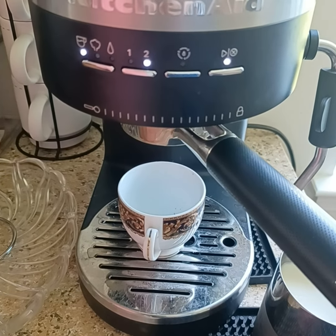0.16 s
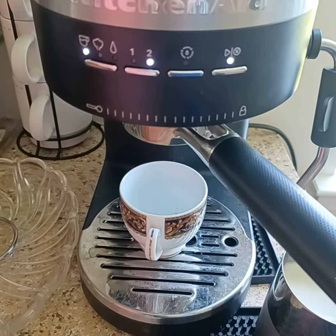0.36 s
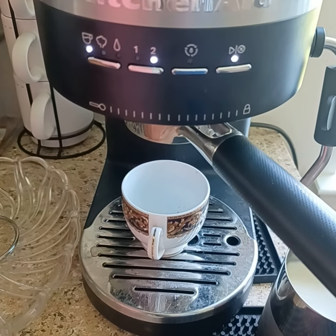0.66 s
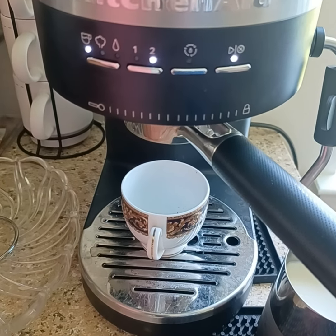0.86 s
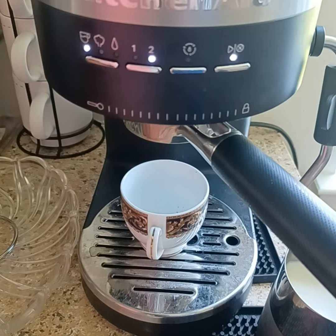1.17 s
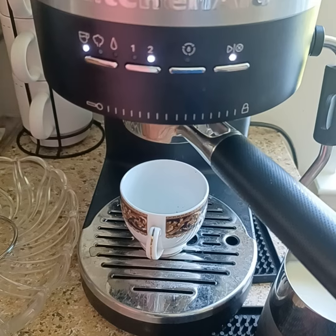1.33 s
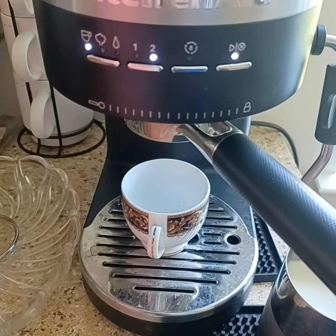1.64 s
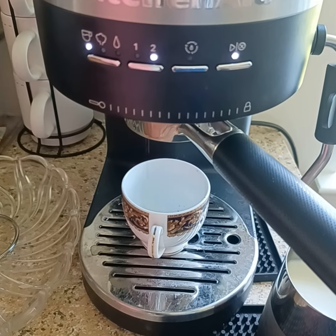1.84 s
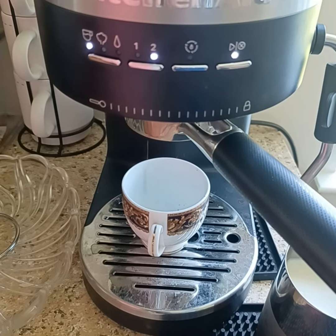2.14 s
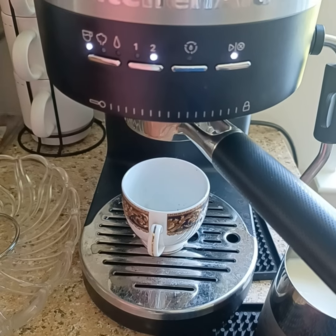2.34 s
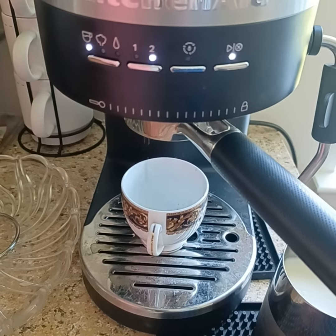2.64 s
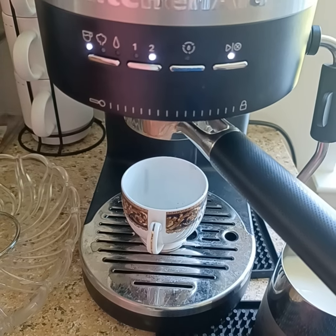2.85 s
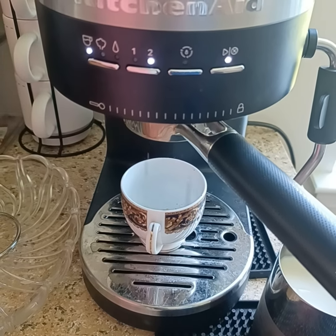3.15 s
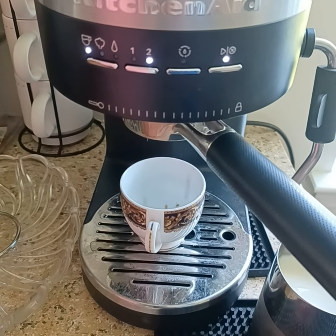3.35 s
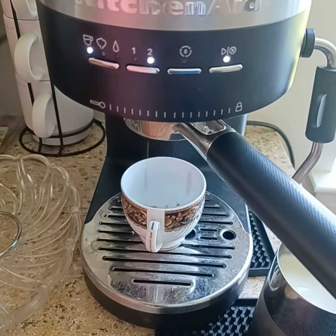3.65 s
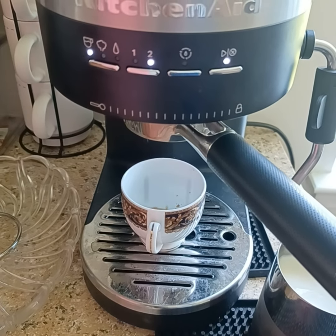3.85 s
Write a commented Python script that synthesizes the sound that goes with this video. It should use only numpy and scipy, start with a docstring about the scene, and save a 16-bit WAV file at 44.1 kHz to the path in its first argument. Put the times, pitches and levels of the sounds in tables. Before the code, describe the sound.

An espresso machine pump runs close to a stereo microphone in a kitchen, a steady low buzzing drone with fast pulsing rattle and hollow housing ring. Short grainy spits of hiss sprinkle over it until 1.8 s. Around 1.95 s it fades quickly with a dull low knock, gone by 2.2 s. Quiet room noise and wavering low hum remain, with faint drip-like ticks near 2.35, 2.9 and 3.1 s.

```python
"""An espresso machine's vibrating pump hums close to a microphone pair in a kitchen: mains-locked tones,
a piston blow per cycle ringing the housing, rattle and chatter as noise pulsing or bursting with the stroke.
The brew head spits grainy bursts of hiss. The pump fades out quickly around a dull two-partial knock;
a wavering far appliance hum, coloured room noise with faint whistles, and a few ticks, perhaps drips, remain."""
import sys
import numpy as np
from scipy import signal
from scipy.fft import rfft, irfft
from scipy.io import wavfile

SR = 44100
rng = np.random.default_rng(int(sys.argv[2]) if len(sys.argv) > 2 else 0)


def linear_from_db(decibels):
    """Turn decibels (scalar or array-like) into linear amplitude factors; 0 gives 1."""
    return 10 ** (np.asarray(decibels, float) / 20)


def to_wav(sig):
    """Store sig (one row per channel, or 1-D mono) as 16-bit WAV at the path in sys.argv[1].

    Samples outside -1..1 are clipped; the rate is SR.
    """
    pcm = np.clip(np.atleast_2d(sig), -1, 1) * 32767
    pcm = np.round(pcm).astype(np.int16)
    wavfile.write(sys.argv[1], SR, pcm.T)  # frames by channels


N = 176400  # samples, 4 s

MAINS_HZ, STROKE_AT_S = 60.0, 0.009  # the first piston blow falls at STROKE_AT_S
MIC_LOW_CUT_HZ, MIC_TOP_CUT_HZ = 62, 15750

# Room noise colour. Each row: frequency in Hz, relative level in dB per Hz.
ROOM_COLOUR = [(24, -49), (45, -10), (75, -13.5), (140, -12), (170, -15.5), (260, -11), (340, -19),
               (410, -21.5), (450, -17), (590, -20), (800, -18), (940, -22.5), (1110, -21.5), (1400, -23.5),
               (2050, -24), (2450, -29), (2750, -37), (3470, -39), (3900, -41.5), (4700, -40.5),
               (5300, -54.5), (6500, -47.5), (8200, -50), (9500, -56), (12500, -51), (15800, -53)]
# How alike the room is at both microphones. Each row: frequency in Hz, likeness from -1 to 1.
ROOM_LIKENESS = [(60, 0.48), (130, 0.81), (290, 0.69), (640, 0.23), (1410, -0.091), (3100, -0.051),
                 (6820, -0.061), (15000, -0.075)]
# Lean of the room noise. Each row: frequency in Hz, left over right in dB.
ROOM_BALANCE = [(60, -3.5), (180, -0.5), (550, 3.5), (1650, 0), (4970, 4.5), (15000, 0.5)]
ROOM_DB = -60  # rms
# Faint narrow hisses in the room. Each row: centre in Hz, width in Hz, level in dB, flicker in dB.
ROOM_WHISTLES = [(814, 41, -76, 1), (2070, 50, -94, -1), (1103, 32, -79, 0), (666, 28, -76, 1)]
# A faint high whine comes and goes. Each row: time in seconds, level in dB.
WHINE_LEVEL = [(0, -99), (2.2, -97), (2.45, -81), (2.7, -91), (3.0, -84), (3.1, -82), (3.3, -88),
               (3.45, -82), (3.6, -83), (3.75, -90), (3.82, -100), (3.92, -84), (4, -87)]
WHINE_HZ, WHINE_WIDTH_HZ = 3480, 90
# The room's hiss from 2.8 to 5 kHz. Each row: time in seconds, level in dB.
UPPER_HISS_LEVEL = [(0, -97), (2.2, -81), (2.45, -78), (2.65, -85), (3.0, -86), (3.3, -83), (3.55, -77.5),
                    (3.7, -86), (4, -99)]

# Far appliance hum. Each row: multiple of mains, level in dB rms, left over right in dB, wander in dB.
HUM_ORDERS = [(2, -56, 3, 1.6), (4, -73.5, 1.8, 1.5), (6, -73, 2, 0)]
# The hum wavers about its mean level. Each row: time in seconds, level in dB.
HUM_SWELL = [(2.2, -62.5), (3.072, -63.5), (3.142, -62), (3.598, -65), (3.622, -66), (4.0, -65.5)]

# Faint ticks. Each row: start in seconds, level in dB, centre in Hz, left over right in dB.
TICKS = [(2.3468, -67, 11000, 12), (2.9225, -58.5, 6000, -1), (2.933, -72, 6500, 14), (2.946, -72, 6600, 2),
         (3.119, -68, 10100, 10)]
# Small bright modes a tick can ring. Each row: frequency in Hz, level in dB, 60 dB decay in seconds.
TICK_MODES = [(5200, -3, .012), (6158, 0, .025), (6600, -3, .03), (8016, -9, .016), (9900, -8, .01),
              (10800, -4, .012), (11700, -6, .01)]
TICK_OFF_DB_PER_OCT, TICK_CONTACT_S = 14, 0.0012  # loss away from the centre; half length of the touch

KNOCK_S, KNOCK_DB, KNOCK_HZ, KNOCK_T60_S = 1.963, -30, 264, 0.053

# Spits of water and air at the brew head. Each row: start in seconds, level in dB, hold in seconds, centre in Hz.
SPITS = [(0.018, -57.5, 0.0057, 3700), (0.069, -50.5, 0.013, 3270), (0.166, -61.5, 0.0054, 3980),
         (0.257, -50.5, 0.0059, 3230), (.311, -42, 0.0059, 2820), (0.337, -50.5, 0.0052, 3400),
         (0.371, -58, 0.004, 3970), (0.57, -42.5, 0.0073, 2700), (0.61, -57, 0.005, 2570),
         (0.629, -55.5, 0.019, 2920), (0.841, -44.5, 0.0063, 3550), (0.944, -55.5, 0.0065, 4040),
         (0.965, -61.5, 0.0074, 3960), (1.068, -45, 0.016, 3300), (1.535, -51, 0.01, 3950),
         (1.713, -61, 0.0057, 5800), (1.747, -55, 0.004, 5470), (1.757, -42.5, 0.013, 3300),
         (1.789, -55, 0.012, 4200), (1.81, -58, 0.0085, 3600)]
# Brew head modes. Each row: frequency in Hz, 60 dB decay in seconds.
SPIT_RINGS = [(1700, 0.09), (2250, 0.11), (3600, 0.0069), (4250, 0.054), (5140, 0.017), (6150, 0.0095)]
SPIT_RISE_S, SPIT_FALL_S, SPIT_TAIL_DB, SPIT_TAIL_S = 0.0014, 0.0041, -5, 0.023
SPIT_WIDTH_OCT, SPIT_GRAIN_DB, SPIT_RING_DB = 1.19, 1.5, -6.5
FIZZ_DB, FIZZ_LOW_HZ, FIZZ_HIGH_HZ, FIZZ_TAIL_DB, FIZZ_TAIL_S = -19.5, 11000, 16300, -2, 0.04
SPIT_HITS_PER_S, SPIT_HIT_DB, SPIT_HIT_SPREAD_DB = 600, 13, 2.5  # crisp drops inside each spit

# Gain of the rattle and chatter as the pump runs and stops. Each row: time in seconds, gain in dB.
RATTLE_GAIN = [(0, 2.5), (.6, 2), (.8, 3), (1.2, 2), (1.6, 2.5), (1.9, 3.5), (1.95, -5.5), (2.0, -11.5),
               (2.06, -17), (2.15, -30), (2.3, -71), (4, -79)]
# Gain of the pump's blows and tones. Each row: time in seconds, gain in dB.
TONE_GAIN = [(0, -1.5), (1.0, 0.2), (1.9, 0.5), (1.94, -5), (1.98, -14), (2.05, -21.5), (2.2, -57),
             (4, -85)]
# Further gain of the piston blows alone. Each row: time in seconds, gain in dB.
BLOW_GAIN = [(0, 4.5), (.3, 1.5), (.6, 2.5), (.8, 3.5), (1.2, 4), (1.5, 2), (1.9, -1), (1.97, 4.5),
             (2.05, -24)]
# Rattle colour. Each row: frequency in Hz, relative level in dB per Hz.
RATTLE_COLOUR = [(24, -60), (45, -14), (80, -22.5), (110, -25.5), (150, -15.5), (190, -21), (242, -15.5),
                 (290, -12.5), (340, -29), (400, -5.5), (480, -9), (600, -12.5), (700, -20), (760, -18),
                 (1050, -16.5), (1180, -19.5), (1320, -18), (1500, -33.5), (1660, -25.5), (2300, -27.5),
                 (3000, -34), (4200, -38.5), (5600, -46.5), (6200, -46.5), (8000, -50), (10500, -72),
                 (12500, -66.5), (15800, -59)]
RATTLE_DB = -42.5  # rms, ahead of its gain
# How deeply the rattle pulses with the stroke. Each row: frequency in Hz, share from 0 to 1.
STROKE_DEPTH = [(100, 0.13), (400, 0.28), (1000, 0.4), (2200, 0.28), (5000, 0.095), (15000, 0.15)]
# How alike the rattle is at both microphones. Each row: frequency in Hz, likeness from -1 to 1.
PUMP_LIKENESS = [(60, 0.15), (130, 0.95), (290, 0.8), (640, 0.45), (1410, 0.3), (3100, 0.15), (6820, 0.35),
                 (15000, 0.4)]
# Lean of the rattle and blows. Each row: frequency in Hz, left over right in dB.
PUMP_BALANCE = [(60, 7), (130, -9), (290, 0.5), (640, 3), (1410, 6), (3100, -2), (6820, 5.5), (15000, 7)]
# The pump reaches the left microphone first. Each row: frequency in Hz, lag of the right in radians.
PUMP_LEAD = [(0, 0), (690, 0.5), (1810, 7), (3010, 16.5), (3620, 20), (4220, 16.5), (4480, 19),
             (5080, 17.5), (6800, 21), (9470, 21.5), (10300, 21.5), (12500, 18.5), (14600, 27), (15300, 20)]
CHATTER_DB, CHATTER_SPREAD_DB, RETURN_DB = -58, 4.5, -3  # CHATTER_DB is rms, ahead of its gain
CHATTER_FALL_S, CHATTER_JITTER_S, CHATTER_LOW_HZ, CHATTER_HIGH_HZ = 0.0076, 0.001, 680, 3380
# Pump tones, half orders from strong and weak strokes in turn.
# Each row: multiple of mains, level in dB rms ahead of the gain, left over right in dB, wander in dB.
PUMP_ORDERS = [(1, -87, 3, 2), (2, -39.5, 1.2, 0), (3, -47.5, -2, -0.5), (3.5, -59.5, -11, 4.5),
               (4, -48.5, 3.5, -1.5), (4.5, -56, -1, 2), (5, -71, -25, 9.5), (6, -50, -5.5, 5),
               (7, -48.5, 8, 3.5), (8, -50.5, 13, 3.5), (9, -81, 5, 16.5), (10, -71.5, 13, 3.5),
               (11, -58, -3, 4), (12, -58.5, -5, 2), (14, -64.5, -6, -2)]
# Housing resonances struck by the piston.
# Each row: frequency in Hz, level in dB ahead of the gains, 60 dB decay in seconds.
HOUSING = [(387, -49, 0.055), (403.4, -40.5, 0.073), (450, -42, 0.07), (483, -46.5, 0.077),
           (711, -55, 0.05), (1069, -47.5, 0.098), (1306, -48, 0.087), (1406, -62, 0.25),
           (1650, -63.5, 0.11), (2213, -55, 0.075)]
BLOW_SPREAD_DB, BLOW_JITTER_S, BLOW_LOW_CUT_HZ = 1.5, 0.000778, 310


def rms_one(x):
    """Scale to unit rms."""
    return x / np.sqrt(np.mean(x ** 2) + 1e-20)


def in_time(rows):
    """Draw a table over time, one value per sample."""
    return np.interp(np.arange(N) / SR, *np.transpose(rows))


def at_hz(points, hz):
    """Read a table on a log-frequency axis."""
    table_hz, values = np.transpose(points)
    return np.interp(np.log(hz), np.log(table_hz), values)


def pan(x, db):
    """Place a sound left or right by level."""
    return x * linear_from_db(np.array([[db / 2], [-db / 2]]))


def two_ears(x):
    """The right microphone hears a sound from the machine later than the left."""
    hz = np.fft.rfftfreq(len(x), 1 / SR)
    lag = np.interp(hz, *np.transpose(PUMP_LEAD))
    return np.array([x, irfft(rfft(x) * np.exp(-1j * lag), len(x))])


def drift(rate):
    """Slow random curve of unit rms: noise low-passed near rate in Hz, computed every 40 samples."""
    r = np.exp(-2 * np.pi * rate * 40 / SR)
    white = rng.standard_normal(N // 40 + 2002)
    slow = signal.lfilter([1], [1, -2 * r, r * r], white)[2000:]
    return np.interp(np.arange(N) / 40, np.arange(len(slow)), rms_one(slow))


def ring(clicks, hz, t60):
    """A unit click sets a sine of height near 1 ringing, falling 60 dB in t60 seconds."""
    r, w = linear_from_db(-60 / (t60 * SR)), 2 * np.pi * hz / SR
    return signal.lfilter([0, np.sin(w)], [1, -2 * r * np.cos(w), r * r], clicks + 1e-18)


def band(x, low_hz, high_hz):
    """Band-pass."""
    edges = [low_hz, min(high_hz, 0.45 * SR)]
    return signal.sosfilt(signal.butter(2, edges, "band", fs=SR, output="sos"), x)


def stroke_phase():
    """Phase of the mains cycle, zero at each nominal blow."""
    return 2 * np.pi * MAINS_HZ * (np.arange(N) / SR - STROKE_AT_S)


def tones(orders, rate):
    """Multiples of mains, wandering in level and phase; below order 2 the microphones are opposed."""
    out = 0
    for order, db, side_db, wander_db in orders:
        level = np.sqrt(2) * linear_from_db(db + min(wander_db, 3) * np.tanh(drift(rate)))
        phase = order * stroke_phase() + 0.25 * wander_db * drift(rate)
        polarity = [[1], [-1 if order < 2 else 1]]
        out = out + pan(-level * np.cos(phase), side_db) * polarity
    return out


def banded_noise(colour, likeness, balance, lead, depth, patchy_db):
    """Coloured stereo noise of unit rms; overlapping bands flicker partly together and pulse with the stroke."""
    hz = np.maximum(np.fft.rfftfreq(N, 1 / SR), 1)
    common, opposed = rfft(rng.standard_normal((2, N)))
    alike = np.clip(at_hz(likeness, hz), -1, 1)
    lag = np.array([np.ones_like(hz), np.exp(-1j * np.interp(hz, *np.transpose(lead)))])
    stereo = np.sqrt(1 + alike) * common * lag + np.sqrt(1 - alike) * opposed * [[1], [-1]]
    lean_db = at_hz(balance, hz) * np.array([[0.5], [-0.5]])
    spectrum = stereo * linear_from_db(at_hz(colour, hz) + lean_db)
    out, together, pulse = 0, drift(0.67), np.cos(stroke_phase())
    for centre in 40 * 2 ** np.arange(0, 9.1, 0.5):
        share = np.clip(1 - 2 * np.abs(np.log2(hz / centre)), 0, 1)
        flicker = linear_from_db(patchy_db * (0.5 * together + drift(6.0)))
        pulsing = 1 + np.clip(at_hz(depth, centre), 0, 1) * pulse
        out = out + flicker * pulsing * irfft(spectrum * share, N)
    return rms_one(out)


def room_noise():
    """Coloured stereo noise, its bands flickering slightly, without any stroke pulse."""
    no_lead, no_pulse = [(0, 0), (SR, 0)], [(100, 0), (10000, 0)]
    return linear_from_db(ROOM_DB) * banded_noise(ROOM_COLOUR, ROOM_LIKENESS, ROOM_BALANCE, no_lead, no_pulse, patchy_db=0.2)


def room_whistles():
    """Narrow bands of noise, most of them swelling and fading by chance."""
    out = 0
    for hz, width, db, flicker_db in ROOM_WHISTLES:
        hiss = rms_one(band(rng.standard_normal((2, N)), hz - width / 2, hz + width / 2))
        out = out + linear_from_db(db + flicker_db * drift(2.3)) * hiss
    return out


def high_whine():
    """A narrow band of noise, heard as a whine, follows its level curve."""
    white = rng.standard_normal((2, N))
    narrow = band(white, WHINE_HZ - WHINE_WIDTH_HZ / 2, WHINE_HZ + WHINE_WIDTH_HZ / 2)
    return linear_from_db(in_time(WHINE_LEVEL)) * rms_one(narrow)


def upper_hiss():
    """Noise band-passed twice for steeper edges follows its level curve."""
    white = rng.standard_normal((2, N))
    return linear_from_db(in_time(UPPER_HISS_LEVEL)) * rms_one(band(band(white, 2800, 5000), 2800, 5000))


def appliance_hum():
    """Even multiples of mains from a far appliance waver together."""
    swell_db = in_time(HUM_SWELL)
    return linear_from_db(swell_db - swell_db.mean()) * tones(HUM_ORDERS, rate=1.7)


def ticks():
    """Each tick, a brief rough touch, rings the small bright modes, strongest near its centre."""
    out = 0
    for start_s, db, centre_hz, side_db in TICKS:
        touch = np.hanning(int(2 * TICK_CONTACT_S * SR))
        rough = touch * rng.standard_normal(len(touch)) / np.sqrt(np.sum(touch ** 2))
        click = np.zeros(N)
        i = int(start_s * SR)
        click[i:i + len(touch)] = rough
        tick = 0
        for hz, mode_db, t60 in TICK_MODES:
            off_db = TICK_OFF_DB_PER_OCT * abs(np.log2(hz / centre_hz))
            tick = tick + linear_from_db(db + mode_db - off_db + rng.normal(0, 1.6)) * ring(click, hz, t60)
        out = out + pan(tick, side_db)
    return out


def knock():
    """The last blow as the pump runs out: one click rings a low mode and its weaker octave."""
    click = np.zeros(N)
    click[int(KNOCK_S * SR)] = linear_from_db(KNOCK_DB)
    return ring(click, KNOCK_HZ, KNOCK_T60_S) + 0.42 * ring(click, 2 * KNOCK_HZ, KNOCK_T60_S)


def spits():
    """Grainy bursts of hiss and drops ring the brew head: quick rise, hold, fall, faint tail, lingering top."""
    out, t = np.zeros((2, N)), np.arange(int(0.2 * SR)) / SR
    for start_s, db, hold, hz in SPITS:
        after, rise = np.maximum(t - hold, 0), np.minimum(t / SPIT_RISE_S, 1)
        fall = np.exp(-after / SPIT_FALL_S)
        shape = rise * (fall + linear_from_db(SPIT_TAIL_DB) * np.exp(-after / SPIT_TAIL_S))
        linger = rise * (fall + linear_from_db(FIZZ_TAIL_DB) * np.exp(-after / FIZZ_TAIL_S))
        white, rough = rng.standard_normal((2, len(t))), rng.standard_normal(len(t))
        hit = rng.random(len(t)) < SPIT_HITS_PER_S / SR
        hit_level = linear_from_db(SPIT_HIT_DB + SPIT_HIT_SPREAD_DB * rng.standard_normal(len(t)))
        white = white + two_ears(hit * hit_level * np.sign(rough))
        grain = linear_from_db(SPIT_GRAIN_DB * rms_one(band(rough, 44, 296)))
        half_width = 2 ** (SPIT_WIDTH_OCT / 2)
        body = rms_one(band(white, hz / half_width, hz * half_width))
        rings = 0
        for mode_hz, t60 in SPIT_RINGS:
            mode_db = rng.standard_normal() - 10 * abs(np.log2(mode_hz / hz))
            rings = rings + linear_from_db(mode_db) * ring(white, mode_hz, t60)
        body = body + linear_from_db(SPIT_RING_DB) * rms_one(rings)
        fizz = linear_from_db(FIZZ_DB) * rms_one(band(white, FIZZ_LOW_HZ, FIZZ_HIGH_HZ))
        i = int(start_s * SR)
        out[:, i:i + len(t)] += linear_from_db(db) * (shape * grain * body + linger * fizz)
    return out


def rattle():
    """The housing rattles: coloured noise pulsing with the stroke, most deeply near 1 kHz."""
    noise = banded_noise(RATTLE_COLOUR, PUMP_LIKENESS, PUMP_BALANCE, PUMP_LEAD, STROKE_DEPTH, patchy_db=-0.25)
    return linear_from_db(RATTLE_DB) * noise


def chatter():
    """Loose parts chatter at the blow and, more weakly, at the return stroke: short dying bursts of hiss."""
    at = np.arange(STROKE_AT_S, N / SR - 0.02, 0.5 / MAINS_HZ)
    late, strength = rng.standard_normal((2, len(at)))
    is_return = np.arange(len(at)) % 2
    i = np.clip((at + CHATTER_JITTER_S * late) * SR, 0, N - 1).astype(int)
    clicks = np.zeros(N)
    clicks[i] = linear_from_db(CHATTER_SPREAD_DB * strength + RETURN_DB * is_return)
    bursts = signal.lfilter([1], [1, -np.exp(-1 / (CHATTER_FALL_S * SR))], clicks + 1e-18)
    hiss = band(bursts * rng.standard_normal((2, N)), CHATTER_LOW_HZ, CHATTER_HIGH_HZ)
    return linear_from_db(CHATTER_DB) * rms_one(hiss)


def piston_blows():
    """Every stroke strikes each housing mode a little early or late, with its own strength."""
    at = np.arange(STROKE_AT_S, N / SR - 0.02, 1 / MAINS_HZ)
    out = 0
    for hz, db, t60 in HOUSING:
        late, strength = rng.standard_normal((2, len(at)))
        i = np.clip((at + BLOW_JITTER_S * late) * SR, 0, N - 1).astype(int)
        clicks = np.zeros(N)
        clicks[i] = -linear_from_db(db + BLOW_SPREAD_DB * strength)
        out = out + pan(two_ears(ring(clicks, hz, t60)), at_hz(PUMP_BALANCE, hz))
    return signal.sosfilt(signal.butter(4, BLOW_LOW_CUT_HZ, "high", fs=SR, output="sos"), out)


def pump():
    """Noise, blows and mains-locked tones of the vibrating pump follow their gain curves until it stops."""
    noisy = linear_from_db(in_time(RATTLE_GAIN)) * (rattle() + chatter())
    blows = linear_from_db(in_time(BLOW_GAIN)) * piston_blows()
    return noisy + linear_from_db(in_time(TONE_GAIN)) * (blows + tones(PUMP_ORDERS, rate=3.8))


def scene():
    """The kitchen behind, the far hum, then the machine close by."""
    room = room_noise() + room_whistles() + high_whine() + upper_hiss()
    return room + appliance_hum() + ticks() + knock() + spits() + pump()


def low_pass(x):
    """Removes everything above the highest recorded frequency."""
    return signal.sosfilt(signal.butter(12, 15800, fs=SR, output="sos"), x)


def record(dry):
    """A small microphone pair with a low cut and a steep top cut."""
    low_cut = signal.butter(4, MIC_LOW_CUT_HZ, "high", fs=SR, output="sos")
    top_cut = signal.cheby2(14, 50, MIC_TOP_CUT_HZ, fs=SR, output="sos")
    mix = signal.sosfilt(top_cut, signal.sosfilt(low_cut, dry))
    return low_pass(mix)


dry = scene()
out = record(dry)
to_wav(out)
```